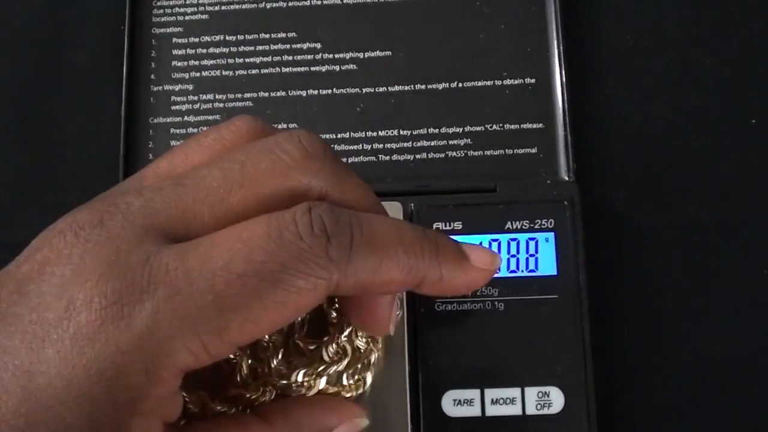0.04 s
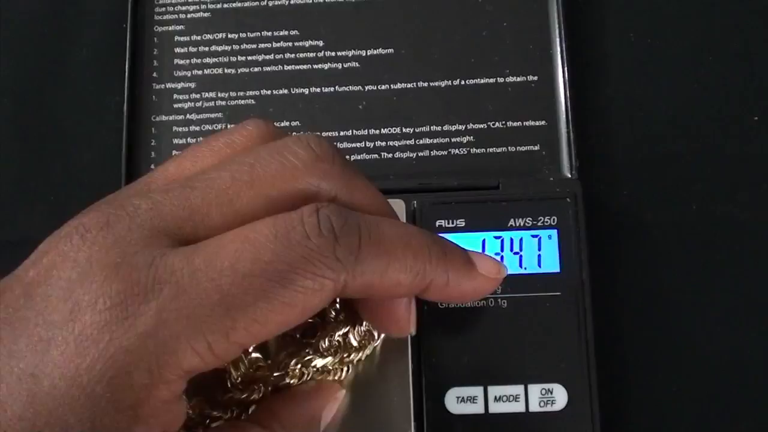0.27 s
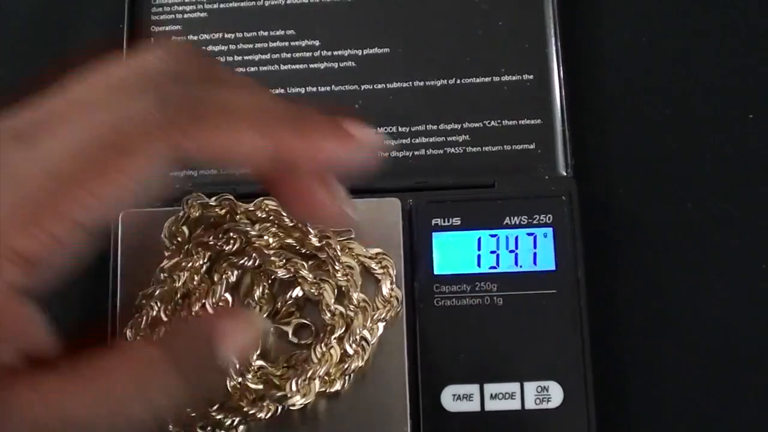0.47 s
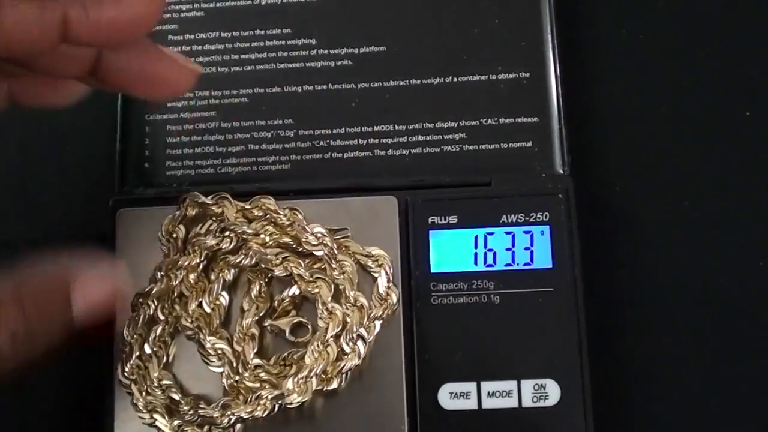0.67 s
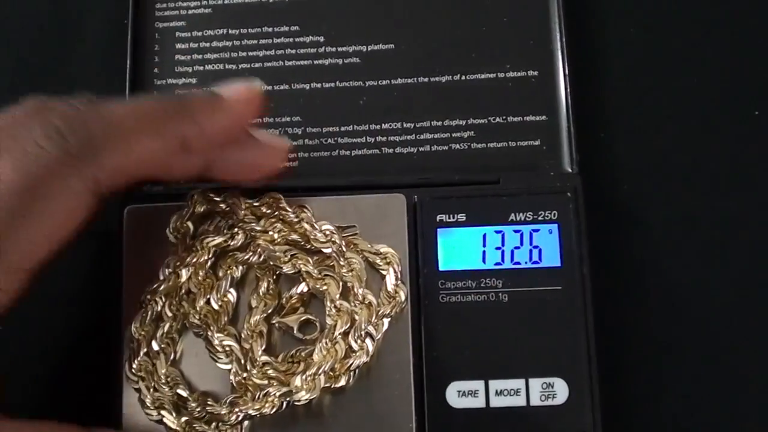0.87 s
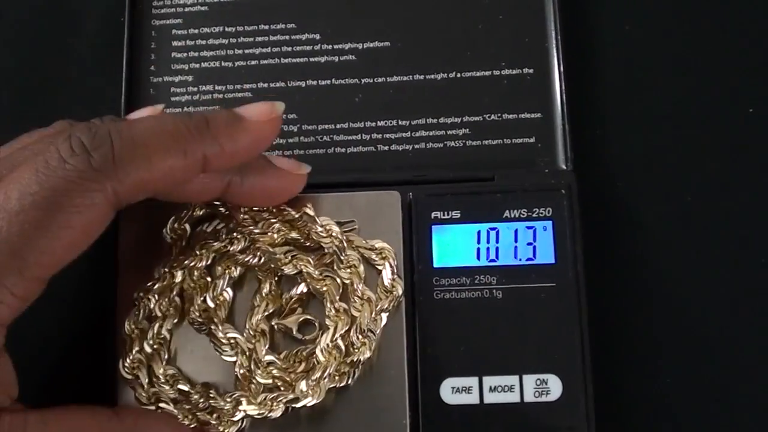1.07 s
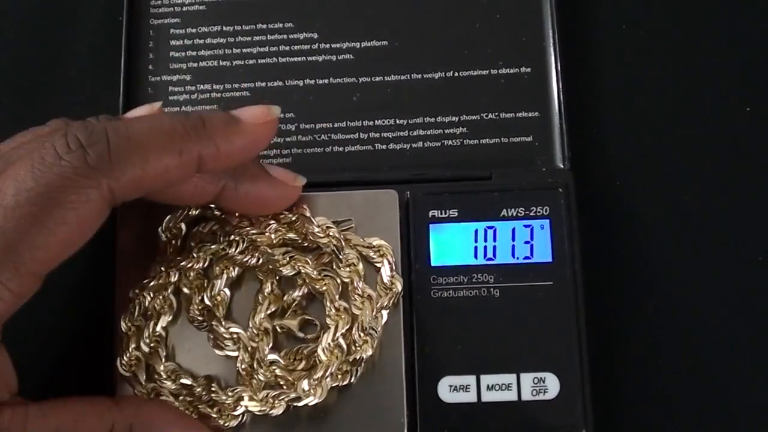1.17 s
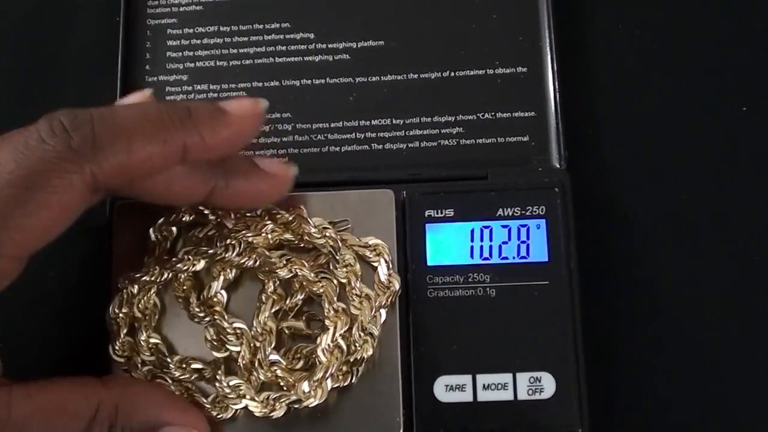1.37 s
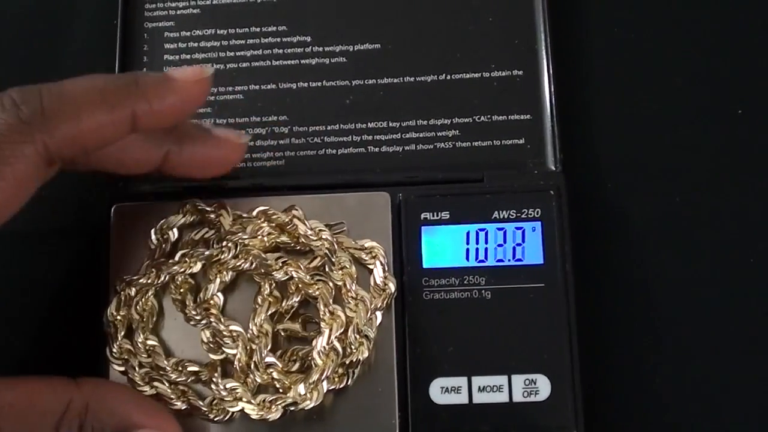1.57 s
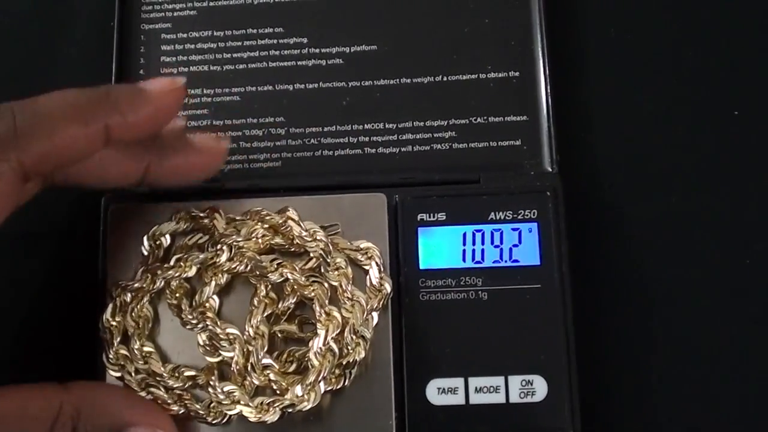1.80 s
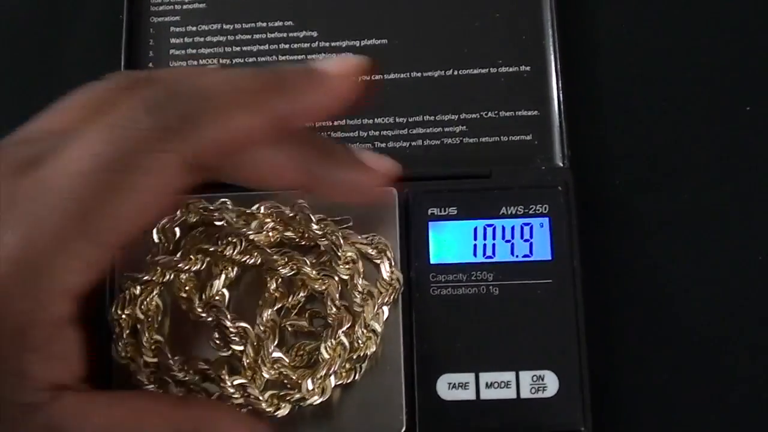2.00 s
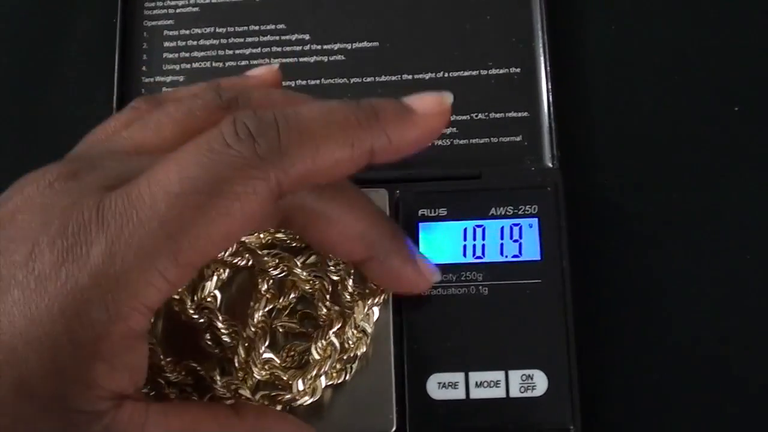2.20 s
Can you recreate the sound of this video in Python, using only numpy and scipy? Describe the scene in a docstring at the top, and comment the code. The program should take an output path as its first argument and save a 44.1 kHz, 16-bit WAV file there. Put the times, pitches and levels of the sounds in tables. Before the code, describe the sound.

Metal chain links clinking and sliding on a small steel pan, then nudged lightly.

```python
"""A heavy rope chain is pressed onto the steel pan of a pocket scale, let go, then nudged three times.
Sliding links rustle in a stream of tiny contacts and snap into place with dry clinks that ring the pan.
Landing weight knocks the case; the heaviest blow thuds the table. The pressing hand rumbles softly.
Close microphone, small quiet room with a faint electrical hum and whine."""
import sys
import numpy as np
from scipy import signal
from scipy.fft import rfft, irfft, next_fast_len
from scipy.io import wavfile
from scipy.ndimage import map_coordinates

SR = 44100
rng = np.random.default_rng(int(sys.argv[2]) if len(sys.argv) > 2 else 0)


def file_out(sig):
    """Save sig as 16-bit WAV at sys.argv[1]."""
    # one column per channel
    cols = np.atleast_2d(sig).T
    # limit, then scale
    lim = np.clip(cols, -1, 1)
    pcm = np.round(lim * 32767).astype(np.int16)
    wavfile.write(sys.argv[1], SR, pcm)


N = 99225

ROOM_SPECTRUM = [(20, -30), (55, -15), (115, -5.5), (170, -2), (310, -2), (370, -5.5), (600, -10.5),
                 (2000, -15.5), (7500, -21), (16000, -23)]  # room noise: f/Hz, relative density/dB
ROOM_ENVELOPE = [(0, -44.5), (.6, -51), (2.25, -48)]  # room noise: t/s, level/dB
ROOM_COHERENCE = [(150, 0.99), (550, 0.38), (1650, 0.016), (4970, 1)]  # room noise: f/Hz, left-right correlation
MAINS_TONES = [(318, -67.5), (480, -66), (8392, -63.5), (8570, -71.5), (8629, -72)]  # electrical hum and whine: f/Hz, level/dB
WALL_DECAY = [(300, 0.092), (2000, 0.074), (10000, 0.065)]  # reverberation: f/Hz, t60/s
WALL_GAIN = [(300, -16.5), (1000, -11), (2500, -30), (6000, -48), (12000, -52)]  # reverberation: f/Hz, gain/dB
HAND_SPECTRUM = [(20, -30), (70, -9.5), (150, 2.5), (350, -7), (700, -14.5), (2000, -61)]  # handling rumble: f/Hz, relative density/dB
TABLE_MODES = [(67.6, -51, 0.23), (124, -56, 0.11)]  # table top: f/Hz, level/dB, t60/s
CASE_MODES = [(783, -10.5, 0.017), (936, -1.5, 0.024), (1079, 0.5, 0.021), (1420, -16.5, 0.019),
              (2060, -3, 0.006), (3800, -12.5, 0.015)]  # scale case: f/Hz, gain/dB, t60/s
PAN_MODES = [(1038, -20.5, 0.051), (1436, -12, 0.015), (2242, 3.5, 0.011), (2370, -9, 0.037),
             (2600, -14, 0.0074)]  # steel pan: f/Hz, gain/dB, t60/s
CASE_KNOCKS = [(0.1398, -39, 1090), (0.1872, -36, 1120), (.1979, -27.5, 1047), (.3, -35, 1090),
               (.3762, -27.5, 1080), (.3986, -21.5, 1010), (1.5268, -33, 1070), (1.7278, -44, 1310)]  # weight or finger landing: t/s, gain/dB, strongest mode f/Hz
RUSTLE_SPECTRUM = [(300, -21), (700, -20), (1500, -18), (2700, 2.5), (3800, -1.5), (5000, -.5),
                   (6300, -1.5), (8000, 0.5), (10000, -3.5), (12500, -11), (16000, -21)]  # sliding links: f/Hz, relative gain/dB
# sliding intensity, one table per hand move: t/s, level/dB
PRESS_SLIDE = [(0, -55.5), (.03, -50), (.065, -47), (.085, -56.5), (.125, -47), (.145, -35.5),
               (.165, -41.5), (.2, -36), (.22, -39.5), (.25, -38.5), (.265, -35.5), (.29, -43.5),
               (.312, -34), (.326, -47.5), (.365, -57), (.38, -30), (.391, -43.5), (.406, -38), (.425, -48),
               (.455, -58.5), (.485, -49.5), (.54, -58.5)]
NUDGE_1_SLIDE = [(.99, -71), (1.0, -53), (1.025, -55), (1.053, -40.5), (1.065, -47.5), (1.076, -37),
                 (1.1, -45.5), (1.14, -49.5), (1.155, -62)]
NUDGE_2_SLIDE = [(1.18, -60), (1.2, -52), (1.245, -45), (1.29, -51.5), (1.333, -44), (1.37, -53.5),
                 (1.39, -36), (1.42, -35), (1.44, -57), (1.465, -35.5), (1.478, -53.5), (1.497, -42),
                 (1.52, -56)]
NUDGE_3_SLIDE = [(1.76, -69), (1.795, -43.5), (1.82, -39.5), (1.835, -38), (1.846, -56), (1.88, -53),
                 (1.91, -60)]
LINK_SPECTRUM = [(600, -22), (1400, -24), (2200, 1.5), (2900, 3), (4100, 8.5), (5500, -6.5), (7200, 5),
                 (10400, 1), (12200, -4), (16000, -8)]  # struck link: f/Hz, relative gain/dB
LINK_SLIPS = [ (.04, -39, 7000), (.132, -31, 9900), (0.3858, -29, 9000), (1.052, -34.5, 9500),
              (1.1905, -38, 9000), (1.3137, -39.5, 6000), (1.331, -37.5, 6850), (1.35, -42.5, 7500),
              (1.3902, -31, 6500), (1.445, -41, 7000), (1.4646, -31.5, 6500), (1.4838, -39, 6500),
              (1.5043, -38, 8000), (1.763, -37, 9050), (1.864, -41, 7700), (1.881, -43.5, 6200)]  # single links slipping: t/s, relative level/dB, f/Hz
FREE_LINK_NOTES = [(.1083, 4440, -27), (.1319, 10620, -27), (.2578, 10640, -24.5), (.3756, 3440, -19),
                   (.3756, 4890, -22), (.3985, 3560, -22), (.3985, 7140, -15), (.4343, 10510, -22),
                   (.4651, 6040, -29), (.4651, 7070, -26), (.4651, 10270, -31), (.5149, 3410, -27),
                   (1.4254, 6210, -23), (1.5269, 3390, -36), (1.7628, 5650, -40), (1.8281, 2840, -33)]  # links hanging free for a moment: t/s, f/Hz, level/dB
# links snapping home: t/s, relative level/dB, f/Hz, treble shelf/dB, relative pan level/dB
LINK_SNAPS = [ (0.1085, -30.5, 4650, 7, -28.5), (0.1394, -29.5, 6050, -10, -35),
              (0.2576, -22, 9500, -3, -40), (0.2709, -24.5, 8500, 2, -26.5), (.3, -21, 8350, 3.5, -27),
              (0.3058, -22, 5200, -9, -27), (0.3123, -27.5, 4400, -6, -38), (0.3756, -15.3, 4500, 7, -18.5),
              (0.3945, -16.5, 7400, -5, -39), (0.3982, -14.8, 6500, 10, -26.5),
              (0.4344, -22, 7100, -3, -34.5), (.465, -22.5, 8100, -12, -35), (.5149, -28, 7300, -9, -54),
              (1.0421, -35.5, 4120, -9, -39.5), (1.071, -29.5, 6130, -3, -42),
              (1.4252, -18.5, 7800, -10, -41.5), (1.4288, -24.5, 7300, -10, -39),
              (1.49, -33.5, 7440, 2, -49), (1.5269, -41, 3370, -12, -50), (1.8109, -31.5, 6960, -14, -41),
              (1.828, -37, 8400, -7, -42)]

LINK_GAIN_DB, LINK_T60_S = 8.5, 0.007


def amp(db):
    """Decibels to gain."""
    return 10 ** (np.asarray(db) / 20)


def unit(x):
    """Scale to rms 1."""
    return x / np.sqrt(np.mean(x ** 2) + 1e-20)


def decay(t, t60_s):
    """Exponential fall, 60 dB in t60_s."""
    return np.exp(-np.log(1000) * t / t60_s)


def along(points, hz):
    """Interpolate (f/Hz, value) rows on a log axis."""
    point_hz, values = np.transpose(points)
    return np.interp(np.log(hz + 1), np.log(point_hz + 1), values)


def envelope(rows):
    """Gain from (t/s, level/dB) rows; ends held near the scene's edges, else silent outside."""
    times_s, db = np.transpose(rows)
    before_db = db[0] if times_s[0] < .05 else -120
    after_db = db[-1] if times_s[-1] > 2 else -120
    return amp(np.interp(np.arange(N) / SR, times_s, db, left=before_db, right=after_db))


def filtered(x, response):
    """Apply a frequency response by FFT."""
    size = next_fast_len(N + SR // 2)
    return irfft(rfft(x, size) * response(np.fft.rfftfreq(size, 1 / SR)), size)[..., :N]


def shaped(x, spectrum):
    """Filter by (f/Hz, gain/dB) rows."""
    return filtered(x, lambda hz: amp(along(spectrum, hz)))


def add(track, start_s, sound):
    """Mix a sound in at start_s."""
    part = track[max(round(start_s * SR), 0):][:len(sound)]
    part += sound[:len(part)]


def ring(modes, rise_s=0.00011, scatter_rad=1.2, scatter_db=1.33):
    """Struck body: damped sines, phases and levels scattered per blow."""
    hz, db, t60_s = np.transpose(modes)[:, :, None]
    t = np.arange(SR // 10) / SR
    phase = scatter_rad * rng.standard_normal(hz.shape)
    gain = amp(db + rng.normal(0, scatter_db, hz.shape))
    waves = gain * decay(t, t60_s) * np.cos(2 * np.pi * hz * (t - 2 * rise_s) + phase)
    return waves.sum(0) * (1 - np.exp(-t / rise_s))


def resonate(x, modes):
    """Driven body: parallel resonators of alternating sign, output rms 1."""
    def response(hz):
        total = 0
        for k, (mode_hz, db, t60_s) in enumerate(modes):
            width_hz = np.log(1000) / np.pi / t60_s
            total += (-1) ** k * amp(db) * 1j * hz / (mode_hz ** 2 - hz ** 2 + 1j * hz * width_hz)
        return total
    return unit(filtered(x, response))


def room_tone():
    """Low murmur of air and hiss; stereo width varies with frequency."""
    def mid_side_gain(hz):
        angle = np.arccos(np.clip(along(ROOM_COHERENCE, hz), -1, 1)) / 2
        return amp(along(ROOM_SPECTRUM, hz)) * [np.cos(angle), np.sin(angle)]
    mid, side = filtered(rng.standard_normal((2, N)), mid_side_gain)
    return envelope(ROOM_ENVELOPE) * unit(np.array([mid + side, mid - side]))


def whine(drift_ratio=0.00065):
    """Electrical hum and whine: sines sharing a slight pitch drift."""
    drift = drift_ratio * map_coordinates(rng.standard_normal(60), [np.linspace(0, 59, N)])
    warped_s = np.cumsum(1 + drift) / SR
    return sum(np.sqrt(2) * amp(db) * np.sin(2 * np.pi * hz * warped_s) for hz, db in MAINS_TONES)


def wall_reverb(x):
    """Short small-room tail, different in each channel."""
    hz, t, noise = signal.stft(rng.standard_normal((2, SR // 2)), SR, nperseg=256)
    tail = signal.istft(noise * decay(t, along(WALL_DECAY, hz)[:, None]), SR, nperseg=256)[1]
    wet = signal.fftconvolve(x[None], tail / np.linalg.norm(tail[0]), axes=1)[:, :N]
    return shaped(wet, WALL_GAIN)


def surface_scatter(x, gain_db=-18, t60_s=.02, cutoff_hz=4000):
    """Nearby surfaces scatter a little sound to the sides."""
    t = np.arange(SR // 20) / SR
    impulse = rng.standard_normal(len(t)) * decay(t, t60_s)
    side = signal.fftconvolve(x, impulse / np.linalg.norm(impulse))[:N]
    side = amp(gain_db) * filtered(side, lambda hz: 1 / (1 + 1j * hz / cutoff_hz))
    return np.array([side, -side])


def hand_rumble(level_db=-49.5):
    """The hand rumbles softly while bearing on the chain."""
    press = envelope(PRESS_SLIDE)
    effort = (press / press.max()) ** 0.32
    return amp(level_db) * effort * unit(shaped(rng.standard_normal(N), HAND_SPECTRUM))


def table_thud(start_s=.399):
    """The heaviest blow excites the table's low modes."""
    t = np.maximum(np.arange(N) / SR - start_s, 0)
    return sum(amp(db) * decay(t, t60_s) * np.sin(2 * np.pi * hz * t) for hz, db, t60_s in TABLE_MODES)


def case_knocks():
    """Landing weight knocks the hollow case; each knock has its own pitch."""
    out = np.zeros(N)
    strongest_hz = max(CASE_MODES, key=lambda mode: mode[1])[0]
    for start_s, db, hz in CASE_KNOCKS:
        retuned = np.array(CASE_MODES) * [hz / strongest_hz, 1, 1]
        add(out, start_s, amp(db) * ring(retuned))
    return out


def load_detune(x, depth_ratio=.035, rate_hz=40):
    """Shifting weight detunes the pan at random."""
    n = np.arange(N)
    detune = depth_ratio * np.interp(n * rate_hz / SR, n, rng.standard_normal(N))
    return map_coordinates(x, [n + np.cumsum(detune)], mode="mirror")


def spread_hz(low_hz, high_hz, count):
    """One random frequency in each of count equal bands."""
    return low_hz + (high_hz - low_hz) * (np.arange(count) + rng.random(count)) / count


def link_contacts(kinds=32, rate_hz=1900, spread_db=4.5, note_db=-5):
    """Random tiny contacts; each kind of link has its own noise burst and short note."""
    t = np.arange(SR // 100) / SR
    sizes = amp(spread_db * np.clip(rng.standard_normal((kinds, N)), -2, 2))
    hits = (rng.random((kinds, N)) < rate_hz / kinds / SR) * sizes
    bursts = rng.standard_normal((kinds, len(t))) * decay(t, t60_s=0.0047)
    note_hz = spread_hz(4440, 11330, kinds)[:, None]
    notes = amp(note_db) * np.sin(2 * np.pi * note_hz * t) * decay(t, t60_s=0.0093)
    return signal.fftconvolve(hits, bursts + notes, axes=1).sum(0)[:N]


def chain_rustle(pan_db=-2, case_pressed_db=-3, case_nudged_db=-10):
    """Sliding links hiss and drive pan and case; the case answers more under pressure."""
    pressed = envelope(PRESS_SLIDE)
    nudged = envelope(NUDGE_1_SLIDE) + envelope(NUDGE_2_SLIDE) + envelope(NUDGE_3_SLIDE)
    contacts = link_contacts()
    links = unit(shaped(contacts, RUSTLE_SPECTRUM))
    pan = amp(pan_db) * load_detune(resonate(contacts, PAN_MODES))
    case_drive = amp(case_pressed_db) * pressed + amp(case_nudged_db) * nudged
    return (pressed + nudged) * (links + pan) + case_drive * resonate(contacts, CASE_MODES)


def struck_link(pitch_hz, shelf_db, t60_s=LINK_T60_S, mode_count=26):
    """Link in the heap: many choked modes, boosted near its pitch; sharp contacts lift the top."""
    shelf_hz, shelf_width_hz, peak_width_oct = 10700, 160, 0.47
    hz = spread_hz(900, 16400, mode_count)
    treble_db = shelf_db / (1 + np.exp((shelf_hz - hz) / shelf_width_hz))
    peak = 0.3 + np.exp(-.5 * (np.log2(hz / pitch_hz) / peak_width_oct) ** 2)
    gain = amp(along(LINK_SPECTRUM, hz) + treble_db) * peak
    mode_db = 20 * np.log10(gain / np.linalg.norm(gain))
    return ring(np.column_stack([hz, mode_db, np.full(mode_count, t60_s)]))


def link_ticks(pan_db=-4):
    """One link slips: a dry tick that barely rings the pan."""
    out = np.zeros(N)
    for start_s, db, pitch_hz in LINK_SLIPS:
        tick = amp(LINK_GAIN_DB) * struck_link(pitch_hz, shelf_db=-8)
        add(out, start_s, amp(db) * (tick + amp(pan_db) * ring(PAN_MODES)))
    return out


def chain_clinks(shiver_db=-24, pan_gain_db=5.5):
    """A link snaps home, its neighbours shiver, the pan rings; free links add single notes."""
    out = np.zeros(N)
    for start_s, db, pitch_hz, shelf_db, pan_db in LINK_SNAPS:
        snap = struck_link(pitch_hz, shelf_db)
        shiver = amp(shiver_db) * struck_link(pitch_hz, shelf_db, t60_s=0.06, mode_count=70)
        pan = amp(pan_db + pan_gain_db) * ring(PAN_MODES)
        add(out, start_s, amp(db + LINK_GAIN_DB) * (snap + shiver) + pan)
    note_t60_s = .011
    for start_s, hz, db in FREE_LINK_NOTES:
        add(out, start_s, ring([(hz, db, note_t60_s)]))
    return out


def scene():
    """Chain and scale close to the microphone, plus reflections and room background."""
    low_cut = signal.butter(8, 733, "high", fs=SR, output="sos")  # the impacts are kept clear of the lows
    impacts = signal.sosfilt(low_cut, chain_clinks() + link_ticks() + case_knocks())
    direct = impacts + table_thud() + chain_rustle() + hand_rumble()
    return direct + surface_scatter(direct) + wall_reverb(direct) + room_tone() + whine()


def record(dry):
    """Brick-wall low-pass at 16 kHz."""
    return filtered(dry, lambda hz: hz < 16000)


dry = scene()
out = record(dry)
file_out(out)
```